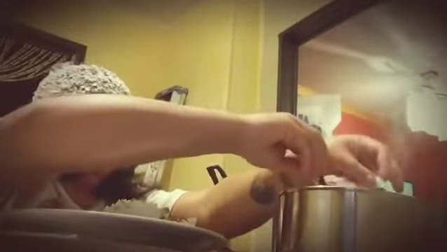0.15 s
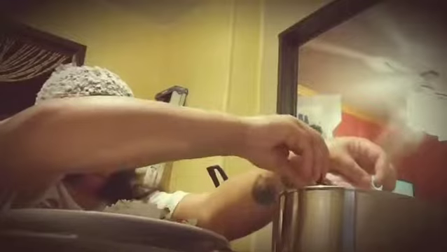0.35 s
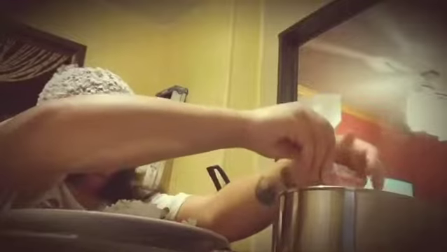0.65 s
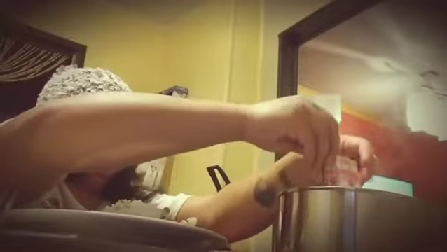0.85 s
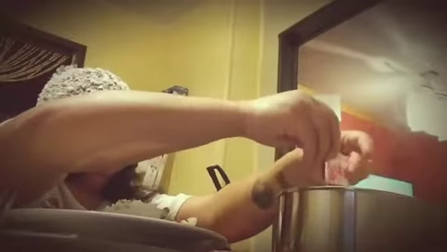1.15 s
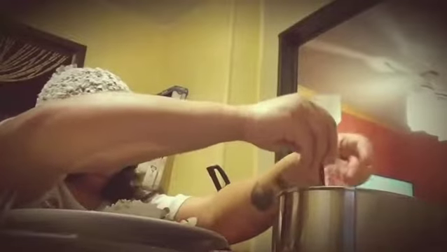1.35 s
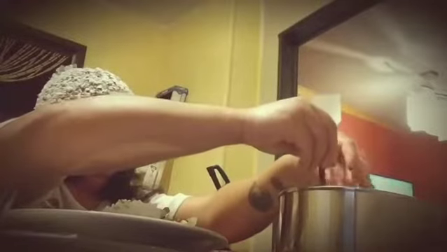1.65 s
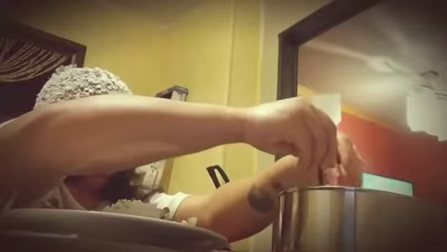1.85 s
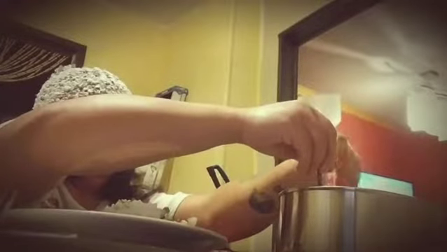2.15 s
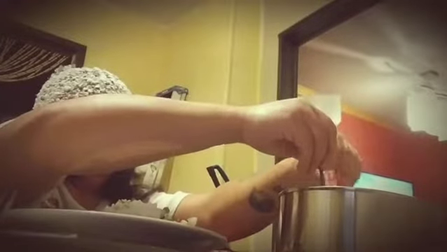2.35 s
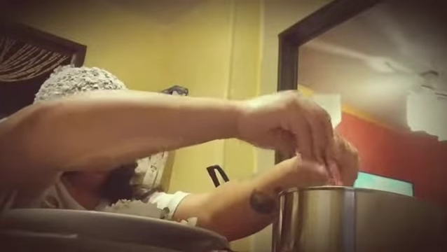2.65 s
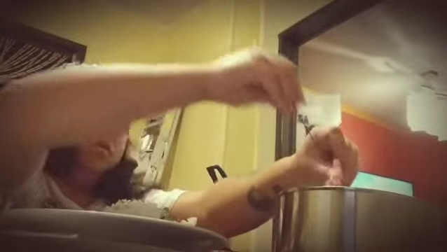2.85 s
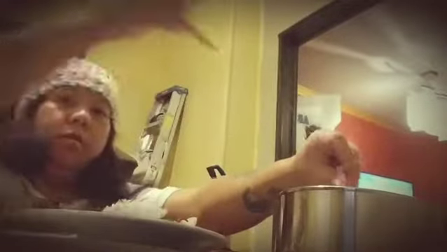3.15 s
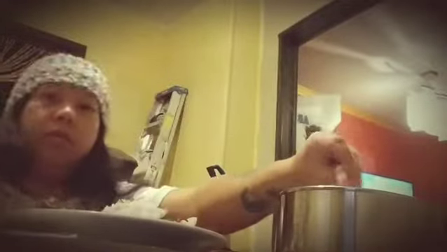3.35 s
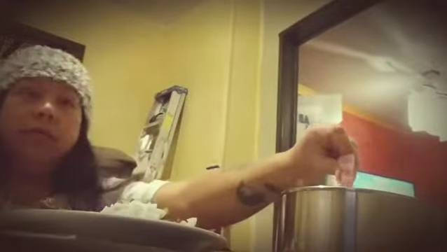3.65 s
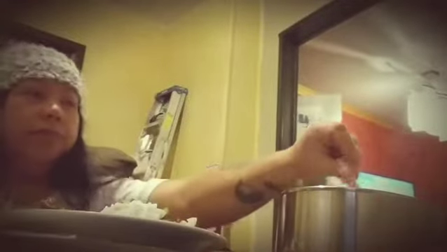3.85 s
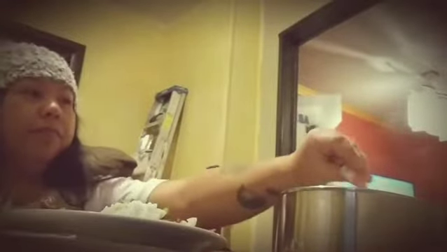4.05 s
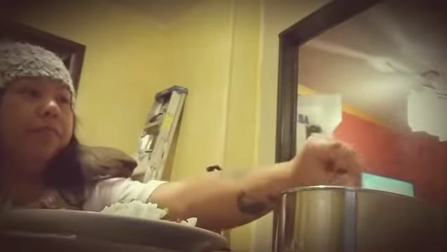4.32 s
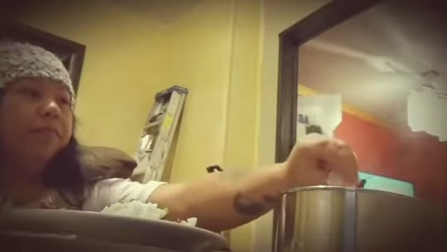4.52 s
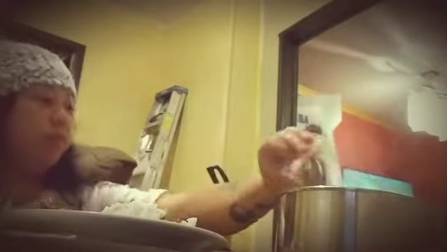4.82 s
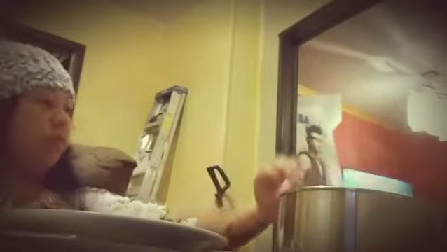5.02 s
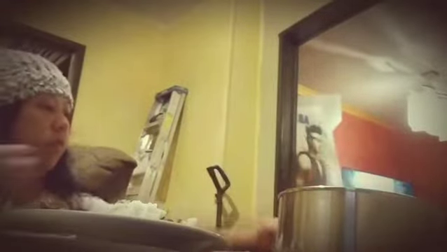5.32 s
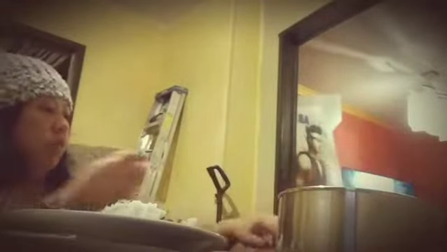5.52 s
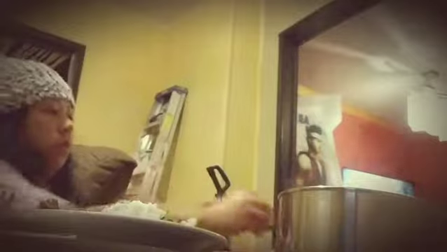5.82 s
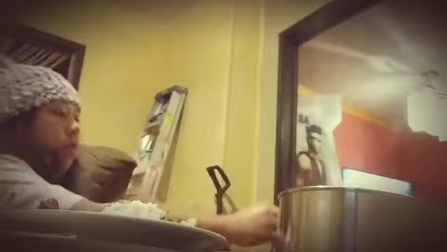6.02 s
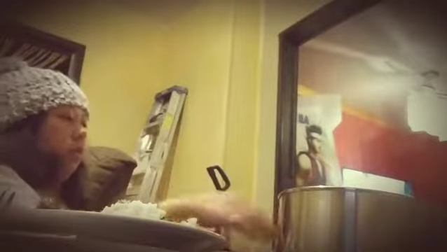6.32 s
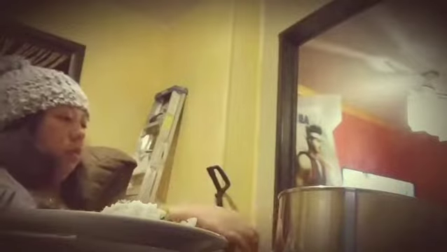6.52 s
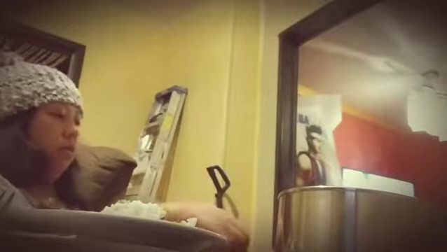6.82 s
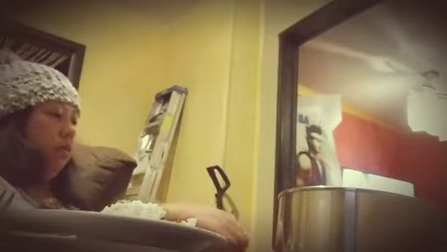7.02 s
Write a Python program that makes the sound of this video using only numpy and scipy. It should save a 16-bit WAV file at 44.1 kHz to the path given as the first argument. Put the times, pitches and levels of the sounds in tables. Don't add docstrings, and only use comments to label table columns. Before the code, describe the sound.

Thin plastic packet crinkles lightly, then crackles densely as it is torn and squeezed, fading before soft knocks on a table and a brief dish scrape.

```python
import sys
import numpy as np
from scipy import signal
from scipy.fft import rfft, irfft, next_fast_len
from scipy.io import wavfile
from scipy.ndimage import uniform_filter1d

SR = 44100
rng = np.random.default_rng(int(sys.argv[2]) if len(sys.argv) > 2 else 0)


def put_to_file(sound):
    columns = np.atleast_2d(sound).T
    safe = np.clip(columns, -1, 1)
    whole_steps = np.round(safe * 32767)
    wavfile.write(sys.argv[1], SR, whole_steps.astype(np.int16))


def how_loud(loudness_db):
    steps = np.asarray(loudness_db, float) / 20
    return 10 ** steps


N = 316188
TOP_HZ = 14600


def along(points, hz, column=1):
    p = np.asarray(points, float)
    return np.interp(np.log(hz + 1), np.log(p[:, 0] + 1), p[:, column])


def curve(rows, column):
    p = np.asarray(rows, float)
    return np.interp(np.arange(N) / SR, p[:, 0], p[:, column], left=-120, right=-120)


def unit(x):
    return x / np.sqrt(np.mean(x ** 2) + 1e-20)


def filtered(x, response):
    size = next_fast_len(N + SR // 2)
    return irfft(rfft(x, size) * response(np.fft.rfftfreq(size, 1 / SR)), size)[..., :N]


def causal(gain):
    cepstrum = irfft(np.log(gain + 1e-6))
    half = len(cepstrum) // 2
    cepstrum[1:half] *= 2
    cepstrum[half + 1:] = 0
    return np.exp(rfft(cepstrum))


def band(lo_hz, hi_hz):
    return lambda f: (1j * f / lo_hz / (1 + 1j * f / lo_hz) / (1 + 1j * f / hi_hz)) ** 2


def modes(table):
    def response(f):
        total = 0
        for k, (hz, width_hz, db) in enumerate(table):
            damping = 1j * f * width_hz
            total = total + (-1) ** k * how_loud(db) * damping / (hz * hz - f * f + damping)
        return total
    return response


def patchy(x, depth_db):
    z = signal.stft(x, nperseg=256)[2]
    field = uniform_filter1d(rng.standard_normal(z.shape[1:]), size=6, axis=0)
    field = uniform_filter1d(field, size=24, axis=1)
    return signal.istft(z * how_loud(depth_db * unit(field)), nperseg=256)[1][:, :N]


# start_s (centre), width_s, hum_up_db, rumble_up_db
ARM_LEANS = [
    (3.3, 0.1, 5, -1),
    (4.498, 0.12, 14, -0.5),
    (5.549, 0.12, 6, 4.5),
    (6.329, 0.13, 3.5, 1.5),
    (6.751, 0.056, 7.5, -0.5),
]


def leaning(column):
    t = np.arange(N) / SR
    return sum(row[column] * np.exp(-((t - row[0]) / row[1]) ** 2) for row in ARM_LEANS)


# start_s, hum_db, rumble_db
AIR_LEVELS = [(0.0, -62, -72.5), (2.3, -59, -66.5), (5.3, -58, -59.5), (7.17, -60.5, -59.5)]
# pitch_hz, width_hz, level_db
HUM_MODES = [(28.68, 33, -10), (54.8, 34.3, -4), (95.3, 30.8, -1.5), (118.5, 14.9, -1)]
# freq_hz, level_db_per_hz
RUMBLE_SPECTRUM = [(90, -45), (140, 3), (270, -4), (365, -5), (430, -21), (800, -28), (1500, -26.5),
                   (2200, -56)]
# freq_hz, likeness [-1..1]
RUMBLE_LIKENESS = [(60, 0.71), (240, 0.95), (950, -1.3), (3770, 0.91), (15000, -0.054)]


def air():
    def mid_side_gain(hz):
        turn = np.arccos(np.clip(along(RUMBLE_LIKENESS, hz), -1, 1)) / 2
        return how_loud(along(RUMBLE_SPECTRUM, hz)) * [np.cos(turn), np.sin(turn)]

    mid, side = filtered(rng.standard_normal((2, N)), mid_side_gain)
    hum = unit(filtered(rng.standard_normal((2, N)), lambda hz: modes(HUM_MODES)(hz) ** 2))
    hum = hum[0] + 0.3 * hum[1] * [[1], [-1]]
    hum_db = curve(AIR_LEVELS, 1) + leaning(column=2) - 1.87
    rumble = unit(patchy(np.array([mid + side, mid - side]), depth_db=2.5))
    rumble_db = curve(AIR_LEVELS, 2) + leaning(column=3) + 0.5
    return how_loud(rumble_db) * rumble + how_loud(hum_db) * hum


def bursts(s, db, hz, rise, life, ring, apart, size=128, tail=0):
    lag = 8
    t = np.arange(size) / SR
    chance = rng.standard_normal((len(s), 3 * size + 1))
    lives = t / (life * np.exp(0.4 * chance[:, -1:]))
    fall = np.exp(-lives) + tail * np.exp(-lives / 6)
    shape = (1 - np.exp(-(t / rise) ** 2)) * fall
    wave = shape * (chance[:, :size] + ring * np.sin(2 * np.pi * hz[:, None] * t))
    gain = how_loud(db)[:, None] / np.sqrt(np.sum(wave ** 2, 1, keepdims=True))
    at = np.round(s * SR).astype(int)[:, None] + np.arange(size)
    heard = []
    for port in range(2):
        scatter = shape * chance[:, size * (port + 1):size * (port + 2)]
        sound = gain * (wave + apart * scatter)
        heard.append(np.bincount((at + lag * port).ravel(), sound.ravel(), N + size + lag)[:N])
    return np.array(heard)


# peak_s, crackle_db, body_db, swell_db_per_s, release_db_per_s
FINGER_TOUCHES = [(.19, -47, -60.5, 33, 133), (0.671, -43, -49.5, 578, 141), (.8, -50.5, -68, 85, 94),
                  (0.897, -42.5, -55.5, 293, 137), (1.245, -47.5, -64, 446, 141),
                  (1.36, -57, -58, 570, 101), (1.416, -43, -55, 200, 197), (1.641, -73, -63.5, 400, 81),
                  (1.761, -52, -64, 100, 113), (1.971, -51.5, -55.5, 1293, 155),
                  (2.089, -52.5, -75, 450, 39), (2.362, -42, -47.5, 452, 306),
                  (5.241, -46.5, -53.5, 1602, 242), (5.622, -57.5, -59.5, 900, 42),
                  (5.68, -61, -59.5, 47, 500), (5.839, -63, -66, 146, 200)]
# peak_s, crackle_db, body_db, swell_db_per_s, release_db_per_s
FIRM_SQUEEZES = [(2.502, -33, -47, 696, 243.5), (2.652, -46, -44, 136, 234), (2.731, -38.5, -53, 802, 245),
                 (2.875, -30, -40, 513, 285), (3, -50, -54.5, 76, 83), (3.109, -37.5, -45, 503.5, 124),
                 (3.266, -29, -38.5, 600.5, 150.5), (3.424, -41.5, -44, 178, 153),
                 (3.531, -37.5, -47, 302, 107), (3.655, -30.5, -35.5, 254, 197),
                 (3.802, -31, -43.5, 165, 169.5), (3.993, -28, -36, 478.5, 256),
                 (4.145, -40, -46.5, 298, 104), (4.2, -37, -66, 157, 280), (4.354, -40.5, -37.5, 223, 202),
                 (4.492, -32, -41.5, 137, 263), (4.639, -42, -46, 412, 116),
                 (4.81, -39.5, -42.5, 331, 352.5), (4.88, -46, -46.5, 91, 121), (4.986, -51, -44, 61, 153)]


def grip(column, swings):
    rows = np.array(FINGER_TOUCHES + FIRM_SQUEEZES)
    t = np.arange(0, N, 32) / SR
    late_s = t - rows[:, :1]
    drop_db = np.where(late_s < 0, -late_s * rows[:, 3:4], late_s * rows[:, 4:])
    level_db = rows[:, column:column + 1] - swings * drop_db
    return np.interp(np.arange(N) / SR, t, level_db.max(0))


def clumps(size=150):
    smooth = uniform_filter1d(uniform_filter1d(rng.standard_normal(N), size=size), size=size)
    return how_loud(2 * unit(smooth))


def crackle(count=6000):
    draw = rng.random((count, 3))
    s = draw[:, 0] * (N - 1) / SR
    size_db = -3.8 * np.log(draw[:, 1] + 0.00377)
    hz = 3000 * 4.5 ** draw[:, 2]
    fine = unit(bursts(s, size_db, hz, rise=0.000047, life=0.00031, ring=0.31, apart=0.54, size=96))
    fine = fine + 1.66 * rng.standard_normal((2, N))
    body = unit(bursts(s[::3], size_db[::3] / 2, hz[::3] / 5,
                       rise=0.00028, life=0.0023, ring=0.23, apart=0.16, size=256))
    body = body + 0.5 * rng.standard_normal((2, N))
    film = how_loud(grip(column=1, swings=1) - 3.0) * clumps() * filtered(fine, band(1500, 17480))
    body = patchy(filtered(body, band(190, 1690)), depth_db=3.0)
    return film + how_loud(grip(column=2, swings=0.84) + 14.5) * body


# start_s, peak_db, bright_db, pop_db
FILM_CREASES = [(0.2169, -25.5, 8.5, -9), (0.6641, -23, 5, -4.0), (0.6677, -29.5, -1.5, -3),
                (0.6804, -13, -1, -13), (0.8879, -39.5, 10.5, 16), (0.8912, -40, 20.5, 14),
                (0.8937, -17.5, -3, -5), (1.2317, -29.0, 5.5, -8), (1.3492, -20, -22.5, -27.0),
                (1.3633, -22, 5.5, -4.0), (1.41, -21.0, -2.5, -9), (1.4156, -22, -4, -31.0),
                (1.5998, -38, 17, -5), (1.6256, -39.5, 25.5, 6), (1.657, -39.5, 2, 8),
                (1.962, -28.5, 9, -1.5), (2.0269, -32, 2.5, -13), (2.0758, -19.5, -3, -35),
                (2.152, -18, -16, -17), (2.1924, -26.5, -5.5, -6), (2.2044, -40, 17.5, 9),
                (2.2193, -24.5, -8, -4), (2.2362, -18.5, -4.5, -5), (2.2736, -13, -28, -21),
                (2.3263, -14.0, -22, -39.0), (2.4887, -20.0, -40.0, -38.0), (2.4938, -33, 19, 10),
                (2.5606, -26.5, -3.5, -3.0), (2.621, -19, -29, -4), (2.63, -23.0, -26.5, -14.0),
                (2.6391, -20.5, -2.0, -5), (2.666, -16.5, -6.5, -15.0),
                (2.7201, -11.5, -9.5, -14.5), (2.7261, -27, 13.5, -3), (2.7804, -25, -2.5, -8),
                   (2.8452, -30, -34, -2), (2.8486, -19, -14.5, -7.5), (2.8643, -16, -4.5, -14),
                   (2.874, -15.5, -1.5, -5.5), (2.9777, -30.5, -12.5, -7), (2.9915, -15, -3, -32),
                   (3.036, -22.5, 1, -19.5), (3.0693, -51.5, 14, 0), (3.093, -13.5, 5.5, -4.5),
                   (3.1394, -12.5, -15.5, -13), (3.1502, -14.5, -9.5, -17.5), (3.1718, -19, -17, -11),
                   (3.1878, -21, -24, -2), (3.206, -22, -12, -27), (3.244, -3.5, -39, -53),
                   (3.2542, -15, -14.5, 2), (3.2608, -14.5, -5, -35), (3.2683, -6, -19, -19),
                   (3.3034, -13.5, -5.5, -9), (3.343, -36, -15, -40), (3.3886, -19, -15, -27),
                   (3.405, -14.5, -27, -33), (3.4206, -29.5, 18, 6.5), (3.4234, -8, -7, -51),
                   (3.4815, -20.5, -6.5, -28), (3.5163, -17.5, 2, -4), (3.543, -13, -2.5, -28),
                   (3.5545, -19, -15.5, -21), (3.59, -37.5, 12.5, 16.5), (3.6398, -12, -7, -4),
                   (3.6479, -14, -13, -30), (3.654, -16, 12, -6), (3.6637, -15, 5, -2.5),
                   (3.7393, -14.5, -16, -26), (3.772, -8.5, -26, -17), (3.7926, -10, 3, -4.5),
                   (3.8065, -5, -25.5, -20), (3.8287, -15.5, -15.5, -12), (3.839, -23, -1, 6),
                   (3.8479, -33.5, 14, -2), (3.8993, -25.5, -21, -0.5), (3.9132, -21, -7, -23),
                (3.9408, -15, -10, -4.5), (3.9638, -19, -21, -7), (3.98, -5.5, -15, -9.5),
                   (3.9844, -21.5, 8.5, 3), (3.9993, -27.5, 15.5, 12), (4.1217, -19, -10.5, -13),
                   (4.132, -12, -10.5, -21), (4.1388, -28, 12, 0), (4.1487, -41, 16, 24),
                   (4.1576, -23, 12.5, 8.5), (4.189, -17.5, -1.5, 1), (4.2104, -14.5, -2.5, -8.5),
                   (4.2848, -26, -2, -27), (4.3041, -11.5, -4.5, -38), (4.3287, -21, 6.5, -8),
                   (4.35, -21.5, 11.5, -10), (4.3566, -15.5, -1.5, -8), (4.4536, -36, 13, 17),
                   (4.4647, -33.5, 22.5, 15), (4.4699, -13, -11, -8.5), (4.6251, -21, 4.5, -15),
                   (4.6426, -18.5, -14, -22), (4.6464, -12.5, -7, -16), (4.6604, -22.5, 1.5, -27),
                   (4.7165, -28, -14, 0.5), (4.7746, -21, -5, -32), (4.7864, -20, -2.5, -7.5),
                   (4.8032, -16, -6.5, -7), (4.8192, -17, -39, -9), (4.8772, -23, -33, -4),
                   (4.884, -22.5, -5.5, -17), (4.9436, -21, -24, -1), (4.9535, -20.5, -4, -11),
                   (4.9774, -33, 14, 10.5), (5.0517, -27, -22, -2), (5.0957, -36, -28, -2),
                   (5.1303, -39, -23, -11), (5.2278, -34.5, 17, 3.5), (5.6151, -32.5, -19, 1)]
# start_s, peak_db
FILM_TICKS = [(0.228, -33.5), (0.3819, -51), (0.6345, -33), (0.6557, -39), (0.6908, -44), (0.7859, -35),
              (0.8668, -28), (0.9825, -41), (1.2428, -40), (1.2535, -35), (1.348, -31), (1.3752, -22),
              (1.403, -31), (1.479, -45), (1.5707, -51), (1.5962, -40), (1.6098, -42), (1.6206, -38),
              (1.638, -31), (1.6405, -38), (1.7226, -47), (1.745, -31.5), (1.7741, -46), (1.8232, -42),
              (1.973, -29), (1.9835, -39), (2.0474, -34), (2.0865, -31), (2.0962, -51), (2.1063, -25.5),
              (2.1218, -28.5), (2.1636, -30.5), (2.2155, -23), (2.2575, -33), (2.261, -48),
              (2.2876, -27), (2.2946, -37), (2.3372, -41), (2.3464, -24), (2.3518, -22), (2.3597, -31),
              (2.3715, -29.5), (2.467, -33), (2.4826, -40), (2.507, -24.5), (2.535, -29), (2.559, -33),
              (2.5835, -36.5), (2.5925, -31), (2.6556, -38), (2.6763, -40), (2.7368, -22.5),
              (2.8004, -32), (2.825, -38), (2.8332, -30.5), (2.8668, -15.5), (2.8794, -18),
              (2.9651, -29.5),
              (3.0032, -26.5), (3.014, -30), (3.046, -38), (3.0514, -38.5), (3.08, -31.5),
                 (3.1035, -29.5), (3.1097, -16), (3.1129, -23.5), (3.1173, -21.5), (3.1245, -27.5),
                 (3.203, -30), (3.2187, -30), (3.2972, -22), (3.3832, -29), (3.3917, -23.5),
                 (3.3988, -22.5), (3.4152, -26.5), (3.4345, -23.5), (3.4708, -29.5), (3.4941, -46),
                 (3.5115, -33.5), (3.521, -26), (3.5241, -23), (3.5406, -18), (3.5639, -23),
                 (3.6252, -16.5), (3.6299, -23), (3.6338, -15.5), (3.6493, -8), (3.659, -18), (3.7458, -20),
                 (3.752, -25.5), (3.7605, -22), (3.787, -31.5), (3.8172, -22.5), (3.8706, -27),
                 (3.9518, -49), (3.9554, -52), (3.97, -33),
              (3.994, -14), (4.0213, -17), (4.0423, -28.5), (4.077, -38), (4.1019, -32), (4.116, -39),
                 (4.143, -21.5), (4.1662, -17.5), (4.1695, -27), (4.178, -17.5), (4.199, -26),
                 (4.2074, -26), (4.2204, -40), (4.2806, -44), (4.2915, -24), (4.3006, -25), (4.314, -25),
                 (4.3255, -26.5), (4.3459, -17), (4.4147, -32), (4.4276, -33), (4.4346, -24), (4.4387, -19),
                 (4.4425, -21), (4.4448, -21.5), (4.4774, -26), (4.504, -29), (4.507, -19), (4.5199, -20.5),
                 (4.6187, -28), (4.6309, -23), (4.6769, -24), (4.694, -25.5), (4.713, -35), (4.7446, -30),
                 (4.7614, -37), (4.7664, -30), (4.793, -28), (4.8081, -19), (4.8653, -28), (4.8802, -35),
                 (4.9074, -26), (4.9508, -30), (4.9614, -34), (4.973, -34), (5.007, -37), (5.078, -47),
                 (5.238, -41), (5.6263, -37), (5.6291, -27), (5.6492, -27), (5.6608, -33.5), (5.664, -33)]


def snaps():
    tick_db, tick_bright_db, tick_pop_db = -0.5, -7, -6
    crack_s = 0.0003
    ticks = [(s, db + tick_db, tick_bright_db, tick_pop_db)
             for s, db in FILM_TICKS]
    creases = FILM_CREASES + ticks
    s, db, bright_db, pop_db = np.transpose(creases)
    patch_hz = 3500 * 2.407 ** rng.random(len(s))
    start_s = s - 0.00035
    film = bursts(start_s, db + 17.5, patch_hz,
                  rise=crack_s / 2, life=crack_s, ring=0.47, apart=0.52, size=256, tail=0.24)
    edge = bursts(start_s, db + bright_db + 24.5, 2 * patch_hz,
                  rise=crack_s / 2, life=crack_s, ring=0.62, apart=0.88, size=256, tail=0.17)
    bag = bursts(start_s, db + pop_db + 22, patch_hz / 4.03,
                 rise=0.0007, life=0.0037, ring=0.32, apart=0.55, size=384)
    film = filtered(film, band(2400, 6680))
    edge = filtered(edge, lambda hz: band(6500, 24000)(hz) ** 2)
    return film + edge + filtered(bag, band(430, 2200))


def aftershock(creases, fade_s=0.0058, pull=0.072):
    shaken = signal.lfilter([1], [1, -np.exp(-1 / (fade_s * SR))], creases[0] ** 2)
    shaken_db = 10 * np.log10(shaken + 1e-7)
    return how_loud(pull * (shaken_db - uniform_filter1d(shaken_db, size=2600)))


# freq_hz, t60_s
KITCHEN_T60 = [(300, 0.21), (2000, 0.2), (8000, 0.15), (14000, 0.17)]


def kitchen(x, wait=190):
    hz, t, z = signal.stft(np.pad(x, (wait, 0))[:N], SR, nperseg=128)
    power = uniform_filter1d(np.abs(z) ** 2, size=7, axis=0)
    keep = how_loud(-120 * t[1] / along(KITCHEN_T60, hz))
    held = np.array([signal.lfilter([1 - k], [1, -k], row) for k, row in zip(keep, power)])
    noise = signal.stft(rng.standard_normal((2, N)), SR, nperseg=128)[2]
    noise = noise / np.sqrt(np.mean(np.abs(noise) ** 2))
    return signal.istft(noise * np.sqrt(np.abs(held)), SR, nperseg=128)[1][:, :N]


# pitch_hz, width_hz, level_db
POT_MODES = [(1405, 110, -2.5), (794, 87, -8.5), (2360, 300, -17.5)]
# start_s, level_db
POT_NEARNESS = [(0, 25), (.3, 8), (.9, 5.5), (1.2, -17), (1.66, 9), (2.2, 5), (2.8, -3.5), (3.2, -1.5),
                (4.2, 1), (5.2, -5.5), (7.17, -9)]


def pot(packet):
    return how_loud(curve(POT_NEARNESS, 1) - 2) * filtered(packet, modes(POT_MODES))


# start_s, level_db
SLEEVE_RUB = [(2.25, -90), (2.38, -63), (2.5, -86), (2.68, -74), (2.76, -67.5), (2.86, -74), (3.0, -66),
              (3.1, -88), (5.0, -90), (5.1, -77), (5.6, -71), (6.0, -74.5), (6.3, -75), (6.75, -78),
              (6.84, -68.5), (6.95, -72), (7.17, -76)]
# pitch_hz, width_hz, level_db
CLOTH_MODES = [(428, 87.4, 3), (860, 600, -11.5)]


def sleeve():
    rub = filtered(rng.standard_normal(N), lambda hz: modes(CLOTH_MODES)(hz) * (hz < 2500))
    return how_loud(curve(SLEEVE_RUB, 1) + 1.5) * unit(rub)


# start_s, peak_db, rattle_db, t60_s
TABLE_KNOCKS = [
    (5.338, -39, -14, 0.29),
    (5.416, -35.5, -14, 0.13),
    (5.513, -41.5, -25, 0.027),
    (6.376, -33, -10, 0.19),
]
# pitch_hz, width_hz, level_db
TABLE_MODES = [(124.7, 81, -17), (267, 90, -6), (330, 107, -9), (647, 58, -19.5)]


def knocks():
    push, rattle = np.zeros(N + SR), np.zeros(N + SR)
    t = np.arange(SR // 4) / SR
    for s, db, rattle_db, t60_s in TABLE_KNOCKS:
        at = slice(round(s * SR), round(s * SR) + len(t))
        blow = t / 0.00094 * np.exp(1 - t / 0.00073)
        grit = how_loud(-1.5 - 60 * t / t60_s) * rng.standard_normal(len(t))
        push[at] += how_loud(db + 23.0) * (blow + grit)
        swell = 1 - np.exp(-(t / 0.011) ** 2)
        rattle[at] += how_loud(db + rattle_db + 22.5 - 60 * t / 0.23) * swell * rng.standard_normal(len(t))

    def rebound(hz):
        return 1 - 0.72 * np.exp(-2j * np.pi * hz * 0.0118) / (1 + 1j * hz / 300)

    ringing = filtered(push[:N], lambda hz: modes(TABLE_MODES)(hz) * rebound(hz))
    return ringing + filtered(rattle[:N], lambda hz: band(350, 950)(hz) ** 2)


# start_s, level_db
DISH_SLIDE = [
    (6.34, -99),
    (6.36, -65.5),
    (6.4, -62),
    (6.45, -73.5),
    (6.5, -87),
]
# pitch_hz, width_hz, level_db
DISH_MODES = [(2320, 740, -4), (3620, 540, 1.5), (6040, 3300, -9)]


def dish():
    scrape = filtered(rng.standard_normal(N), lambda hz: modes(DISH_MODES)(hz) * (hz < 8000))
    return how_loud(curve(DISH_SLIDE, 1)) * unit(scrape)


# freq_hz, left_db, right_db
PORT_COLOUR = [(313, -13.5, -17), (827, -11, -11.5), (1135, -12.5, -19.5), (1328, -9.5, -12.5),
               (1585, -13.5, -20), (2600, -5.5, -9.5), (5170, -3.5, -6.5), (6100, -4, -8.5),
               (7420, 2, -13.5), (8620, -13.5, -6), (10730, -7, -11), (13480, -6, -5), (15100, -15, -23),
               (16140, -42, -37)]


def ports(x):
    return np.array([filtered(x[c], lambda hz: causal(how_loud(along(PORT_COLOUR, hz, c + 1)))) for c in range(2)])


def scene():
    creases = snaps()
    wash = patchy(aftershock(creases) * crackle(), depth_db=4.0) + how_loud(-7.5) * kitchen(creases[0])
    packet = creases + filtered(wash, lambda hz: hz < TOP_HZ)
    table = sleeve() + knocks() + dish()
    return air() + ports(packet + pot(packet)) + table * how_loud([[0.6], [-0.6]])


def roll_off(x):
    return signal.sosfilt(signal.butter(12, 16640, fs=SR, output="sos"), x)


def record(dry):
    def hiss_gain(hz):
        left_db = along([(2000, 1.5), (7500, 2.0), (8500, -1.0), (13000, -1.0)], hz)
        right_db = along([(2000, 2.0), (8000, -3.0), (13000, 2.0)], hz)
        return (hz > 300) * (hz < TOP_HZ) * how_loud([left_db, right_db])

    hiss = unit(filtered(rng.standard_normal((2, N)), hiss_gain))
    mix = dry + how_loud(-74) * hiss
    return roll_off(mix)


dry = scene()
out = record(dry)
put_to_file(out)
```